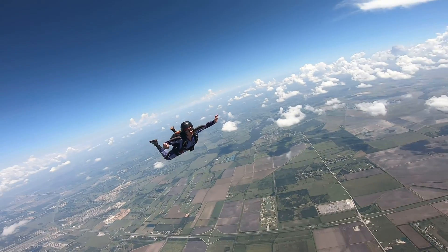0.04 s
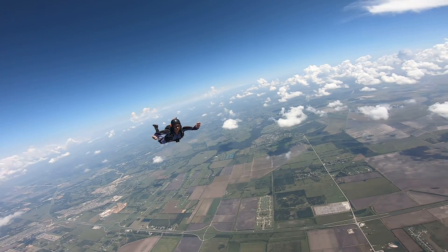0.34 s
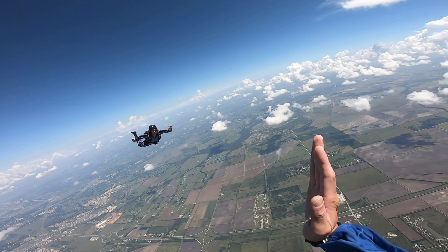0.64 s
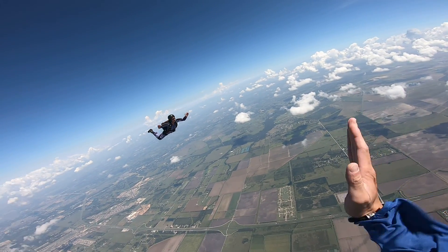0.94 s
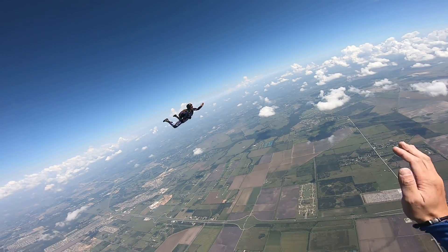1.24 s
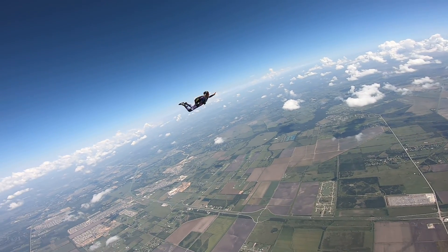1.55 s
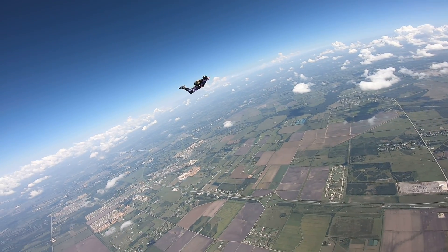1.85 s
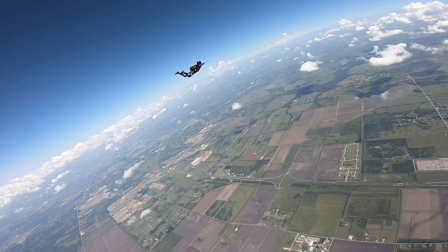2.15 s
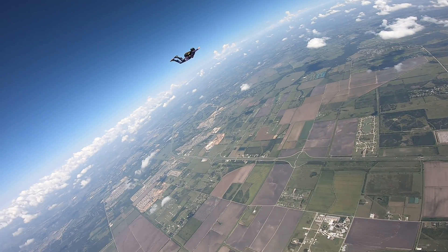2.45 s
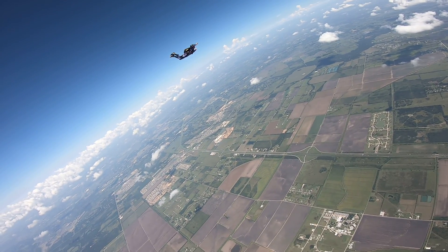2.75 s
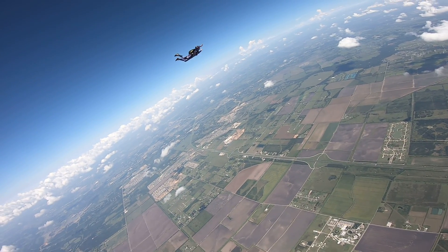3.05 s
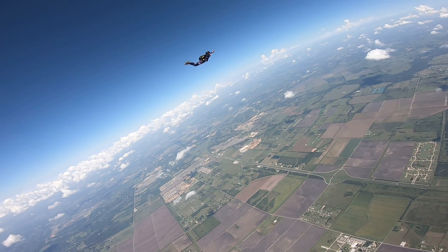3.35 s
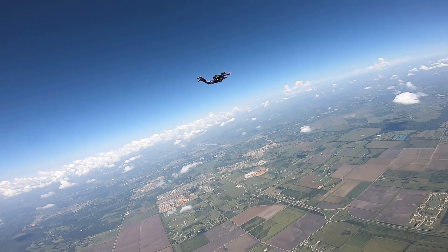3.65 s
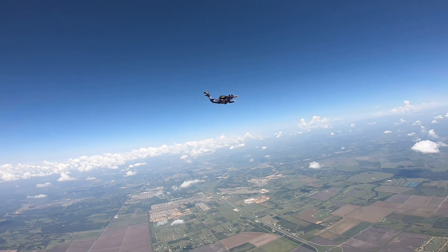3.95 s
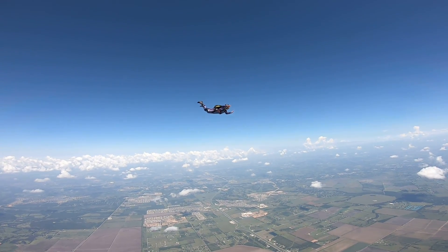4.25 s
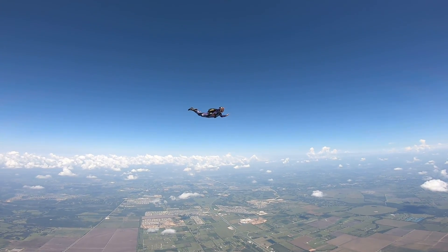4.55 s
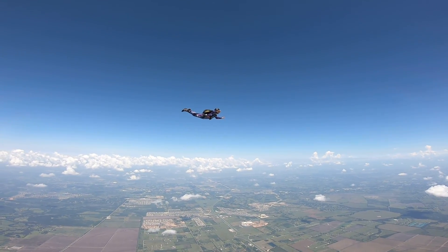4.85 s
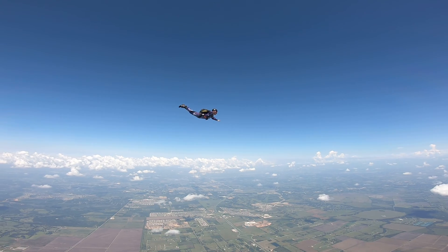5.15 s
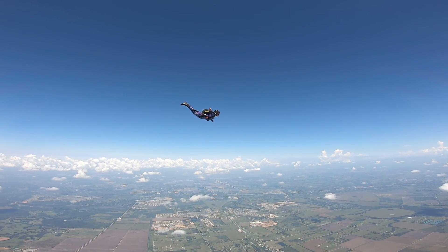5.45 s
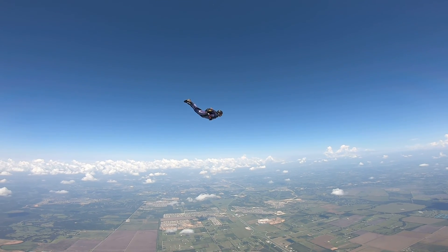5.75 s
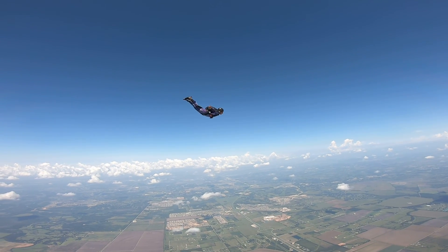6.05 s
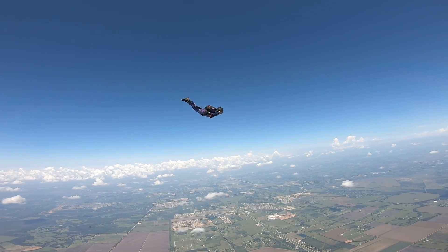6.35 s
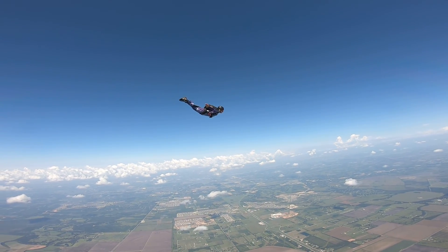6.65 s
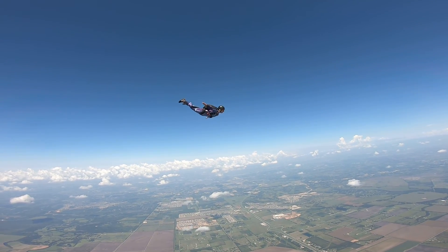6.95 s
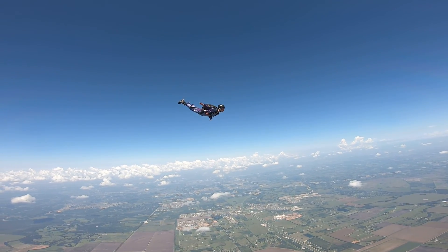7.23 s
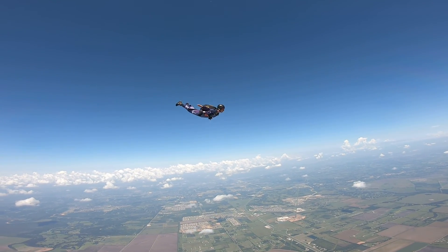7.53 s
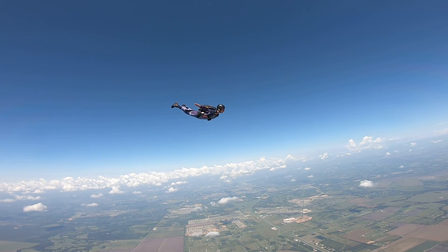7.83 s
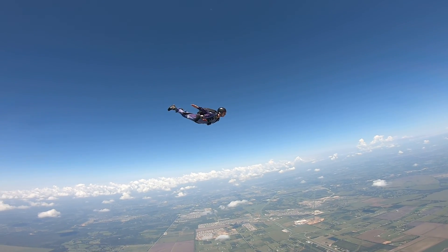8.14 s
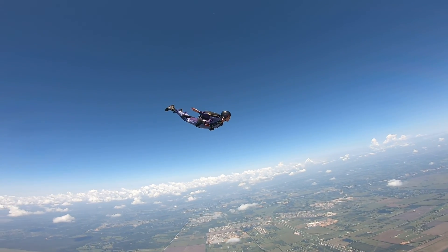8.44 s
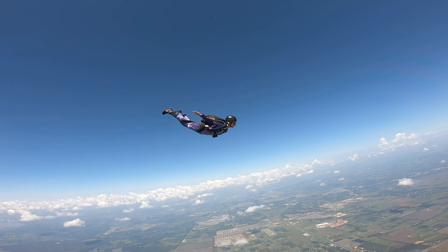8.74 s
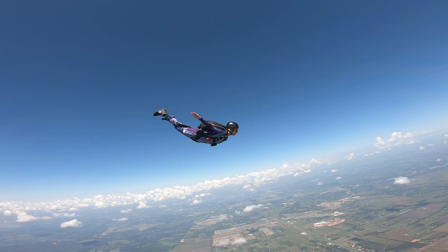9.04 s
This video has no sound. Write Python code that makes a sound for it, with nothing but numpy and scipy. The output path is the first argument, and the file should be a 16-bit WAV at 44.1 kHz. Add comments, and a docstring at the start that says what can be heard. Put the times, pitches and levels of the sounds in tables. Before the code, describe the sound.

A loud, deep rush of wind pounds the microphone of a camera worn by a skydiver falling through open air. Crackling gusts tear across a constant rumble while loose clothing flutters and snaps. About two seconds in, a hiss and a low hollow drone rise for a moment, then give way to a few hard flaps of fabric. The wind then turns choppier, with short thumps, tiny dropouts and faint, fleeting whistles.

```python
"""In open air, in free fall, at the microphone of a camera worn by a skydiver.
Air rushes round the body, sounds brief edge tones and makes loose fabric flutter and crack.
As the head turns, the flow briefly skims the microphone port and hisses. Turbulence dominates:
small eddies tear across the port in crackling gusts, larger ones pound it with thumps and a deep rumble.
A fast limiter holds the level."""
import sys
import numpy as np
from scipy import signal
from scipy.fft import rfft, irfft, next_fast_len
from scipy.io import wavfile
from scipy.ndimage import uniform_filter1d, minimum_filter1d, map_coordinates

SR = 44100
rng = np.random.default_rng(int(sys.argv[2]) if len(sys.argv) > 2 else 0)


def unload_wav(signal):
    """Save mono or channel-first audio to the path in sys.argv[1] as 16-bit WAV at rate SR, clipped to [-1, 1]."""
    wavfile.write(
        sys.argv[1],
        SR,
        np.round(np.clip(np.atleast_2d(signal).T, -1, 1) * 32767).astype(np.int16),
    )


N = 405279
TIME = np.arange(N) / SR

# Levels in all tables are relative; each source applies its own gain.
# Spectra of the air and the fabric: f/Hz, level/dB
RUSH_SPECTRUM = [(100, 7.5), (400, 17.5), (1200, 6.5), (2500, -3.5), (4100, -7), (5000, -17), (5600, -31.5),
                 (8000, -29.5), (11000, -59.5), (15000, -85.5)]
TICK_SPECTRUM = [(500, -27.5), (1600, 3), (2800, 8), (4200, -0.5), (4900, -3), (5600, -19.5), (8000, -35),
                 (12000, -64.5)]
FLAP_SPECTRUM = [(500, -25.5), (1600, 7.5), (2800, 7.5), (4000, 0.5), (5000, -4.5), (5800, -20),
                 (8000, -35), (12000, -63)]
HISS_SPECTRUM = [(300, 17.5), (1000, 15.5), (1900, 17), (3500, 14), (5500, 5.5), (8000, -7.5), (10500, -13),
                 (12500, -41), (15000, -60)]
SNAP_SPECTRUM = [(200, -13), (900, 13.5), (2800, -0.5), (5000, -11), (8000, -22.5), (11000, -36),
                 (15000, -65.5)]
# Spectra of the eddies, from the smallest to the largest: f/Hz, level/dB
FIZZ_SPECTRUM = [(2000, -25), (4500, -1.5), (6000, -0.5), (8000, -3), (9500, -14), (11000, -17),
                 (13000, -35.5), (15500, -49.5)]
RIP_SPECTRUM = [(300, -21), (800, 3.5), (1300, 4), (2100, -2), (3100, -7.5), (4600, -18.5), (5400, -23),
                (8000, -53.5), (11000, -59), (15000, -73)]
ROAR_SPECTRUM = [(100, -13.5), (250, 1.5), (420, 2.5), (750, -2), (1200, -11), (2000, -23), (3100, -38.5),
                 (5000, -56.5), (9000, -86.5)]
BUFFET_SPECTRUM = [(50, -18), (100, -4.5), (140, 0.5), (240, -5), (310, -7.5), (420, -12), (650, -22),
                   (1500, -44), (4000, -78)]
DRONE_SPECTRUM = [(80, -32.5), (145, 4.5), (215, 0.5), (280, -7), (320, -11), (400, -28), (700, -69.5)]
RUMBLE_SPECTRUM = [(10, -42.5), (20, 3.5), (32, -4), (52, 4.5), (75, 2), (105, 3), (140, -9), (220, -15.5),
                   (500, -58.5), (1200, -101)]
# Smooth rush round helmet and suit: t/s, level/dB
RUSH_LEVEL = [(0, -36.5), (3.9, -58), (4.4, -33.5), (5.1, -36.5), (5.35, -29), (5.7, -31.5), (7.7, -37),
              (8.4, -32), (9.19, -33)]
# Edge tones, from low hoots to thin whistles: t/s, level/dB, duration/s, f/Hz
EDGE_TONES = [(1.305, -36, 0.011, 4200), (1.475, -40, .025, 4100), (4.86, -40, .012, 4100),
              (5.396, -38, .014, 3870), (5.996, -20, 0.02, 680), (6.028, -21, .02, 557),
              (6.165, -38, 0.011, 4030), (6.292, -24, 0.034, 630), (6.906, -40, .012, 4350),
              (6.962, -40.5, 0.028, 4050), (7.454, -47, 0.028, 4000), (7.748, -39, 0.011, 3200),
              (8.252, -41, 0.01, 3900), (8.512, -40.5, .014, 4100), (8.776, -38.5, 0.013, 3700),
              (8.845, -42, .014, 4070)]
# Flutter of loose fabric: t/s, level/dB
FLUTTER_LEVEL = [(0, -31), (.6, -61), (1.35, -35), (1.7, -42.5), (2.3, -36), (2.6, -29), (3.3, -46),
                 (3.7, -49.5), (5.7, -49), (6.3, -42.5), (7.7, -42), (8.2, -42.5), (8.7, -46)]
# Hard flaps of loose fabric: t/s, level/dB
FLAPS = [(0.049, -15.5), (.089, -26), (0.1934, -28), (0.5, -13.5), (0.722, -23), (0.758, -11.5),
         (0.815, -16), (0.955, -11.5), (1.0062, -15), (1.306, -20), (1.469, -29), (2.476, -17),
         (2.5215, -20), (3.706, -9.5), (3.771, -9), (3.8402, -8), (3.903, -12), (4.253, -24), (4.341, -17),
         (6.161, -18.5), (6.8172, -23), (7.616, -19.5)]
# Cracks of taut cloth: t/s, level/dB
CRACKS = [(.1646, -22), (0.7157, -19.5), (0.721, -19), (1.029, -18), (1.2831, -20), (1.2923, -26),
          (1.44, -24), (1.555, -25), (1.7498, -22), (1.7687, -21), (1.855, -19.5), (2.0016, -16),
          (2.0212, -18), (3.041, -15.5), (3.5054, -16), (3.842, -19), (3.904, -24), (4.09, -25),
          (4.2067, -30), (4.285, -19), (4.386, -23), (4.5506, -23), (4.6275, -23.5), (4.6944, -29),
          (4.8098, -25), (4.86, -27), (4.9345, -26), (4.957, -35), (5.329, -26), (5.3478, -29),
          (5.5888, -20), (5.877, -21), (6.176, -27), (6.404, -27), (6.414, -22), (6.4422, -25),
          (6.4917, -33), (6.5266, -22), (6.698, -25), (6.821, -23), (6.86, -30), (6.907, -28), (7.092, -33),
          (7.26, -22), (7.32, -28), (7.3793, -29), (7.5, -22), (7.5757, -22), (7.6179, -21), (7.6379, -28),
          (7.7476, -24), (8.3004, -25), (8.809, -22), (8.8576, -28), (8.9607, -41)]
# How far the head is turned into the flow: t/s, share/1
HEAD_TURN = [(2.38, 0.01), (2.55, 0.74), (3.25, 1), (3.45, 0)]
# Air skimming the port: t/s, level/dB
SKIM_LEVEL = [(1.967, -60.5), (1.98, -40), (2.15, -55), (2.3, -38), (2.462, -34), (2.472, -23.5),
              (2.5, -23.5), (2.56, -28), (2.7, -27.5), (2.92, -27), (3.15, -31), (3.42, -26), (3.53, -35),
              (3.57, -86)]
# How squarely the port meets the flow: t/s, share/1
EXPOSURE = [(0, 0.5), (1.1, 0.95), (1.5, 0.67), (3.75, 0.84), (4.1, 0.2), (5.7, 0.02), (6.4, .45), (7.7, 1),
            (8.6, 0.2), (9.19, 0.3)]
# Flow over the port between gusts: t/s, level/dB
FLOW_LEVEL = [(0, -24), (.35, -26), (.42, -22.5), (.62, -27), (.8, -20.5), (1.15, -21.5), (1.48, -27.5),
              (1.6, -24.5), (2.38, -23.5), (2.55, -30.5), (3.35, -30), (3.45, -21.5), (3.95, -22),
              (4.1, -27), (4.75, -33), (5.0, -27.5), (5.25, -29.5), (5.72, -32.5), (5.87, -28), (6.58, -24),
              (6.75, -38.5), (7.05, -26), (7.42, -31.5), (7.5, -27.5), (7.95, -28.5), (9.19, -30.5)]
# The strongest eddies to hit the port: t/s, level/dB, duration before stretch/s
GUSTS = [(0.084, -25.5, 0.014), (0.204, -23, 0.012), (0.233, -23.5, 0.011), (0.276, -17, 0.011),
         (0.299, -28, .014), (0.341, -21, 0.011), (0.504, -22, 0.0098), (0.95, -25, 0.018),
         (1.172, -29.5, .04), (1.256, -26.5, 0.015), (1.354, -23.5, 0.013), (1.565, -21.5, .012),
         (1.577, -21.5, 0.0098), (1.762, -28.5, 0.025), (1.868, -23, .009), (1.897, -20.5, 0.007),
         (2.422, -19.5, 0.012), (3.718, -17, 0.04), (3.781, -18.5, 0.037), (4.008, -18.5, 0.0066),
         (4.041, -30, 0.02), (4.092, -24.5, 0.015), (4.191, -28.5, 0.018), (4.279, -29, 0.04),
         (4.361, -28.5, 0.013), (4.394, -26.5, 0.028), (4.482, -26.5, 0.034), (4.538, -28.5, 0.024),
         (4.579, -20, 0.0092), (4.63, -24.5, 0.0083), (4.642, -25.5, 0.013), (4.69, -29, .022),
         (4.82, -24, 0.03), (4.859, -24, 0.0073), (4.935, -18.5, 0.01), (4.978, -27.5, 0.0082),
         (5.002, -24, 0.027), (5.093, -18, 0.02), (5.115, -26, 0.016), (5.145, -31, 0.0087),
         (5.225, -24.5, 0.016), (5.3, -24.5, 0.0081), (5.347, -28, 0.044), (5.454, -27, 0.047),
         (5.523, -24, 0.018), (5.591, -22.5, 0.015), (5.613, -25, 0.0089), (5.659, -28, 0.011),
         (5.687, -21.5, 0.007), (5.784, -25.5, .008), (5.795, -20.5, 0.019), (5.848, -17.5, 0.011),
         (5.88, -21.5, .011), (5.95, -22.5, 0.0092), (6.039, -25.5, 0.0078), (6.1, -22, .011),
         (6.181, -20.5, 0.023), (6.204, -19.5, 0.016), (6.332, -24, 0.084), (6.414, -21.5, 0.013),
         (6.527, -19, .01), (6.551, -18.5, .006), (6.642, -25.5, 0.015), (6.694, -26, 0.024),
         (6.77, -23.5, .014), (6.842, -25.5, 0.014), (6.863, -24, 0.007), (6.961, -26.5, 0.012),
         (7.025, -25.5, 0.037), (7.059, -27, 0.013), (7.135, -25.5, 0.007), (7.191, -22, 0.008),
         (7.207, -25.5, 0.013), (7.26, -22.5, 0.022), (7.296, -24.5, 0.015), (7.317, -28.5, 0.0092),
         (7.382, -24.5, 0.019), (7.49, -23, 0.027), (7.517, -20.5, .016), (7.55, -20.5, 0.033),
         (7.599, -22, 0.013), (7.619, -23, .011), (7.728, -30, 0.0098), (7.853, -23.5, 0.018),
         (7.984, -22, 0.019), (8.168, -24, .011), (8.212, -24.5, 0.0098), (8.266, -24.5, 0.007),
         (8.316, -27.5, 0.031), (8.379, -26.5, 0.0094), (8.424, -26, 0.0091), (8.445, -25, 0.016),
         (8.538, -22, 0.0059), (8.551, -22.5, 0.0079), (8.582, -29.5, 0.0073), (8.631, -25.5, 0.025),
         (8.722, -20.5, 0.0099), (8.95, -23, 0.024), (9.015, -26, 0.018), (9.061, -27.5, 0.016),
         (9.139, -27.5, 0.0093)]
# The flow lets go of the port: t/s, duration/s
LULLS = [(0.259, 0.031), (0.313, 0.047), (0.364, 0.018), (0.916, 0.064), (1.53, 0.013), (2.282, 0.012),
         (4.066, 0.03), (4.116, 0.02), (4.33, 0.02), (4.43, 0.019), (4.595, 0.03), (4.77, 0.019),
         (5.049, 0.011), (5.182, 0.012), (5.551, .014), (5.622, 0.019), (5.708, 0.015), (5.757, 0.024),
         (6.754, 0.03), (6.791, 0.015), (6.945, 0.027), (6.977, 0.022), (7.128, 0.02), (7.187, 0.037),
         (7.36, .03), (7.43, 0.089), (7.652, 0.011), (7.801, 0.0076), (7.956, 0.024), (8.034, 0.026),
         (8.136, .018), (8.411, 0.021), (8.498, 0.01), (8.601, .014), (8.702, 0.016), (8.767, 0.013),
         (8.838, 0.015), (8.895, 0.043)]
# Chokes of the port, and two brief boosts: t/s, duration before stretch/s, gain/dB
CHOKES = [(0.037, 0.0091, -17), (0.51, 0.007, -14), (0.696, 0.01, -8), (0.827, 0.0073, -11),
          (0.91, .006, -12), (1.049, 0.0047, -19), (1.16, 0.0067, -14), (1.215, 0.015, -20),
          (1.242, 0.014, -13), (1.398, 0.016, -9), (1.462, 0.011, -11), (1.636, 0.0038, 6),
          (1.714, 0.0078, -16), (1.822, 0.0093, -4), (1.952, 0.011, -8), (2.234, 0.0052, -24),
          (2.248, .006, -18.5), (2.281, 0.0086, -10), (2.459, 0.024, -7), (3.098, 0.01, -19),
          (3.164, 0.0056, -7), (3.569, 0.0067, -17), (3.68, 0.0083, -3), (3.732, 0.0084, -7),
          (3.796, 0.0063, -7), (3.876, 0.0086, -11), (3.923, 0.0083, -14), (4.005, 0.011, -16),
          (4.077, 0.0084, -7), (4.241, 0.0065, -8), (5.411, 0.022, -7), (5.637, 0.015, -11),
          (6.554, 0.0091, -11), (6.658, .009, -3), (6.98, 0.011, -1), (7.126, 0.01, 0), (7.608, 0.0085, -5),
          (7.799, 0.0073, 6), (7.908, 0.013, -10), (8.02, 0.01, -7), (8.22, 0.01, -16), (8.345, 0.017, -8),
          (8.566, 0.016, -9)]
# The sharpest snaps at the port: t/s, level/dB
SNAPS = [(0.277, -39), (0.79, -28), (1.556, -29.5), (1.588, -29.5), (1.975, -29), (2.4683, -31),
         (4.933, -41), (5.226, -31.5), (5.306, -26.5), (5.3266, -33.5), (5.4554, -29.5), (5.528, -31),
         (5.875, -37.5), (6.133, -35), (6.3305, -28), (6.355, -27.5), (6.3776, -30), (6.456, -29),
         (6.5425, -31.5), (6.5993, -37.5), (7.022, -28.5), (7.079, -31.5), (7.1903, -40), (7.3776, -44),
         (7.5636, -27)]
# Hollow note in the buffeting: t/s, f/Hz
HOLLOW_PITCH = [(0, 214), (.8, 248), (1.3, 302), (2.2, 292), (2.85, 261), (3.4, 245), (3.9, 201.5),
                (4.5, 286.5), (5.5, 318), (6.1, 214.5), (6.5, 223), (7.5, 193.4), (7.9, 224), (8.2, 255),
                (8.5, 204), (9.19, 206)]


def from_db(db):
    """Amplitude ratio of a level."""
    return 10 ** (np.asarray(db) / 20)


def unit(x):
    """Normalisation to rms 1."""
    return x / np.sqrt(np.mean(x ** 2) + 1e-20)


def curve(rows):
    """Linear interpolation in time."""
    return np.interp(TIME, *np.transpose(rows))


def bell(s, duration):
    """Gaussian pulse of height 1 at time s, `duration` wide at half height."""
    out = np.zeros(N)
    near = slice(max(int((s - 2 * duration) * SR), 0), int((s + 2 * duration) * SR))
    out[near] = .5 ** ((2 * (TIME[near] - s) / duration) ** 2)
    return out


def white():
    """Gaussian white noise."""
    return rng.standard_normal(N)


def colour(x, spectrum):
    """Spectral shaping that conserves the power of white noise."""
    size = next_fast_len(N)
    hz, db = np.transpose(spectrum)
    gain = from_db(np.interp(np.log(np.fft.rfftfreq(size, 1 / SR) + 1), np.log(hz), db))
    return irfft(rfft(x, size) * unit(gain), size)[:N]


def wander(rate_hz):
    """Low-pass random motion of rms 1, mostly slower than rate_hz."""
    coarse = TIME[::8]
    size = next_fast_len(len(coarse))
    gain = 1 / (1 + (np.fft.rfftfreq(size, coarse[1]) / rate_hz) ** 2)
    motion = irfft(rfft(rng.standard_normal(size)) * gain, size)[:len(coarse)]
    return np.interp(TIME, coarse, unit(motion))


def smooth(x, seconds):
    """Triangular running mean."""
    size = max(int(seconds * SR), 1)
    return np.abs(uniform_filter1d(uniform_filter1d(x, size), size)) + 1e-14


def steadied(x, seconds):
    """Division by the running rms holds power constant over spans longer than `seconds`."""
    return x / np.sqrt(smooth(x ** 2, seconds))


def capped(x, crest):
    """One-sided saturation: highs round off at `crest`, dips stay deep."""
    return np.minimum(x, 0) + crest * np.tanh(np.maximum(x, 0) / crest)


def clicks(per_s, spread_db):
    """Poisson impulses of either sign, a few much larger than the rest."""
    sizes = from_db(spread_db * np.minimum(rng.exponential(1, N), 3.5))
    return unit((rng.random(N) < per_s / SR) * np.sign(white()) * sizes)


def tamed(ticks, crest):
    """Soft compression of the local rms towards `crest` at most, then normalisation."""
    return unit(ticks / np.sqrt(1 + smooth(ticks ** 2, 0.0023) / crest ** 2))


def resonate(x, hz, width_hz):
    """A resonance that follows the curve hz; a double pole steepens its sides."""
    carrier = np.exp(2j * np.pi * np.cumsum(hz) / SR)
    pole = np.exp(-np.pi * width_hz / SR)
    return (carrier * signal.lfilter([1], np.poly([pole, pole]), x / carrier)).real


def patchy(x, depth_db, seconds, width_hz):
    """Passing resonances: random patches in time and frequency lift and hollow the noise."""
    frames = signal.stft(x, nperseg=1024, noverlap=768)[2]
    field = rng.standard_normal(frames.shape[::-1]).T
    for axis, span in enumerate((width_hz * 1024 / SR, seconds * SR / 256)):
        size = max(round(0.8 * span), 1)
        field = uniform_filter1d(uniform_filter1d(field, size, axis), size, axis)
    frames = frames * from_db(depth_db * unit(field))
    return unit(signal.istft(frames, nperseg=1024, noverlap=768)[1][:N])


def rush(level_db=1.5, echo=0.75, echo_s=0.0021, sway=0.2, sway_hz=5):
    """Comb filtering: flow noise round the body interferes with its reflection off a swaying arm."""
    direct = patchy(colour(white(), RUSH_SPECTRUM), 4.8, .022, 320)
    delay_s = echo_s * np.exp(sway * wander(sway_hz))
    reflected = map_coordinates(direct, [(TIME - delay_s) * SR], order=1)
    return from_db(curve(RUSH_LEVEL) + level_db) * unit(direct + echo * reflected)


def edge_tones(level_db=-1.5, width_share=0.17, sag_per_s=2.2, ragged_db=4, ragged_hz=200):
    """Flow catching on an edge oscillates in a short, fuzzy note of falling pitch."""
    out, t = np.zeros(N), np.arange(-4096, 4096) / SR
    for s, db, duration, hz in EDGE_TONES:
        swell = .5 ** ((2 * t / duration) ** 2)
        tone = resonate(rng.standard_normal(len(t)), hz * np.exp(-sag_per_s * t), width_share * hz)
        note = unit(swell * tone) * np.sqrt(np.mean(swell ** 2))
        out[round((s + t[0]) * SR):][:len(t)] += from_db(db + level_db) * note
    return out * steadied(from_db(ragged_db * wander(ragged_hz)), .02)


def flutter(level_db=-3.5, clump_db=9.5, clump_hz=14):
    """Aeroelastic flutter: a hem of limited swing ticks in clumps, each ringing at its own pitch."""
    ticks = clicks(per_s=260, spread_db=5)
    clumps = steadied(from_db(clump_db * capped(wander(clump_hz), crest=1.1)), 0.16)
    cloth = colour(tamed(ticks * clumps, crest=2), TICK_SPECTRUM)
    return from_db(curve(FLUTTER_LEVEL) + level_db) * patchy(cloth, 4, .03, 700)


def flapping(flap_db=-11, decay_s=0.008, crack_db=14.5):
    """Impulsive excitation: fabric flaps in a decaying rattle or cracks taut in a single pulse."""
    flaps, cracks, t = np.zeros(N), np.zeros(N), np.arange(2048) / SR
    for s, db in FLAPS:
        flaps[round(s * SR):][:len(t)] += from_db(db + flap_db) * np.exp(-t / decay_s)
    for s, db in CRACKS:
        cracks[round(s * SR)] = from_db(db + crack_db)
    rattle = steadied(clicks(per_s=600, spread_db=3) + 0.15 * white(), 0.007)
    return colour(flaps * rattle + cracks, FLAP_SPECTRUM)


def lulls(depth_db=-7.5):
    """Flow separation: the change in dB as the air briefly lets go of the port."""
    return depth_db * sum(bell(s, duration) for s, duration in LULLS)


def chokes(stretch=1.15):
    """Amplitude gating: the gain of a port that chokes and reopens with edges of 1-2 ms."""
    db = np.zeros(N)
    for s, duration, gain_db in CHOKES:
        half = stretch * duration / 2
        db[max(round((s - half) * SR), 0):round((s + half) * SR)] = gain_db
    return smooth(from_db(db), 0.0012)


def skim(opening, turned, sputter_hz=130, spray_db=-37, spray_follow=0.25):
    """Grazing flow hisses along the port, steadier as the head turns; a fine spray comes in first."""
    hiss = patchy(colour(white(), HISS_SPECTRUM), 1.4, .03, 600)
    depth_db = 1.6 + 1.5 * (1.5 - turned)
    sputter = steadied(from_db(depth_db * capped(wander(sputter_hz), crest=1.3)), 0.064)
    level = from_db(curve(SKIM_LEVEL))
    spray = from_db(spray_db) * level ** spray_follow * colour(white(), FIZZ_SPECTRUM)
    skimming = (TIME > SKIM_LEVEL[0][0]) & (TIME < SKIM_LEVEL[-1][0])
    return skimming * sputter * (opening * level * hiss + spray)


def turbulence(stretch=0.59, unrest_db=4.5, unrest_hz=55):
    """Flow strength fluctuates, less when met squarely, and drops in lulls; gusts add in power."""
    depth_db = unrest_db * (1 - 0.76 * curve(EXPOSURE))
    unrest = steadied(from_db(depth_db * capped(wander(unrest_hz), crest=0.61)), 0.024)
    flow = from_db(curve(FLOW_LEVEL) + lulls()) * unrest
    gust_power = sum(from_db(db) ** 2 * bell(s, stretch * duration) for s, db, duration in GUSTS)
    return np.sqrt(flow ** 2 + gust_power)


def snaps(level_db=18, decay_s=0.0065, tail=0.34):
    """Pressure transients: a steep jump, then a short spit of noise."""
    out, t = np.zeros(N), np.arange(512) / SR
    for s, db in SNAPS:
        spit = tail * np.exp(-t / decay_s) * rng.standard_normal(len(t))
        out[round(s * SR):][:len(t)] += from_db(db + level_db) * ((t == 0) + spit)
    return colour(out, SNAP_SPECTRUM)


def crackle(strength, level_db=-67.5, exposed_db=8.5, follow=1.74, sputter_db=3.5, sputter_hz=120):
    """Shot noise: the smallest eddies spit bright ticks, mostly at the height of a gust."""
    sputter = steadied(from_db(sputter_db * capped(wander(sputter_hz), crest=1.5)), 0.082)
    surge = unit(strength) ** follow * sputter
    ticks = tamed(clicks(per_s=300, spread_db=5), crest=2.6)
    fizz = colour(ticks + 0.76 * white(), FIZZ_SPECTRUM)
    return from_db(level_db + exposed_db * curve(EXPOSURE)) * surge * fizz


def tear(strength, suction, roar_db=3, rip_db=-6, burst_hz=240, contrast=0.41, rip_follow=0.91):
    """Intermittency: small eddies roar and rip in millisecond bursts, favoured by suction at the port."""
    bursts = wander(burst_hz) + 0.3 * suction
    roar_bursts = steadied(from_db(2.55 * bursts), 0.011)
    roar = colour(roar_bursts * white(), ROAR_SPECTRUM)
    rip_bursts = steadied(from_db(7.5 * capped(bursts, crest=2)), 0.027)  # smaller eddies, more ragged
    rip = colour(rip_bursts * white(), RIP_SPECTRUM)
    hollow_roar = steadied(patchy(roar, 2.0, .025, 400), 0.018)
    hollow_rip = patchy(rip, 1.8, .02, 700) * unit(strength) ** (rip_follow - 1)
    swell = steadied(strength, 0.26) ** contrast  # bursts crowd into the height of each gust
    return strength * swell * (from_db(roar_db) * hollow_roar + from_db(rip_db) * hollow_rip)


def buffet(strength, turned, level_db=-18, drone_db=8, exposed_db=5, follow=0.86, waver_hz=22):
    """Vortex shedding: mid-sized eddies thump with a hollow note in gusts and drone in skimming flow."""
    exposure, drone_share = curve(EXPOSURE), 0.78 * turned
    eddies = np.sqrt(1 - drone_share) * colour(white(), BUFFET_SPECTRUM)
    eddies += np.sqrt(drone_share) * colour(white(), DRONE_SPECTRUM)
    note = resonate(white(), curve(HOLLOW_PITCH) + waver_hz * wander(5), width_hz=80)
    hollow = from_db(-8.5 + 2 * turned + 4 * exposure) * unit(note)
    level = from_db(level_db + exposed_db * exposure + drone_db * turned)
    return level * unit(strength) ** follow * steadied(eddies + hollow, 0.39)


def rumble(level_db=-14, heave_db=1.5, heave_hz=12):
    """Pseudo-sound: large eddies press slowly on the diaphragm throughout the fall."""
    level = from_db(level_db + heave_db * wander(heave_hz))
    return level * steadied(colour(white(), RUMBLE_SPECTRUM), 0.068)


def scene(shelter_db=-2, calm_db=-8):
    """Superposition at the port: turning shelters it from turbulence; chokes cut the bass least."""
    turned, opening, lull_db = curve(HEAD_TURN), chokes(), lulls()
    strength = turbulence() * from_db(shelter_db * turned)
    thumps = buffet(strength, turned)
    bass = rumble() + thumps * opening ** 0.49
    suction = -steadied(thumps, 0.019)
    port = tear(strength, suction) + crackle(strength) * from_db(calm_db * turned) + snaps()
    hiss = skim(opening, turned) * from_db(0.63 * lull_db)
    air = rush() * from_db(0.69 * lull_db) + edge_tones()
    fabric = flutter() * from_db(0.9 * lull_db) + flapping()
    return (bass + hiss + opening * (port + air + fabric))[None]


def record(dry, ceiling_db=-4.5, firmness=0.75, hold_s=0.0042, cutoff_hz=13600):
    """Peak limiting turns down the highest crests; a low-pass filter then limits the band."""
    wanted = np.minimum(1, from_db(ceiling_db) / (np.abs(dry[0]) + 1e-9)) ** firmness
    gain = smooth(minimum_filter1d(wanted, int(2 * hold_s * SR)), hold_s)
    lowpass = signal.firwin(511, cutoff_hz, window=("kaiser", 9), fs=SR)
    return signal.oaconvolve(dry * gain, lowpass[None], "same")


dry = scene()
out = record(dry)
unload_wav(out)
```